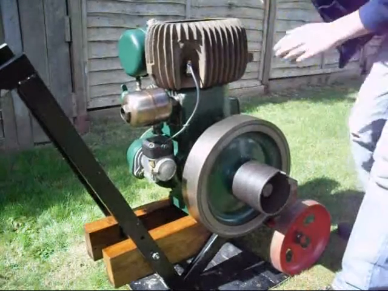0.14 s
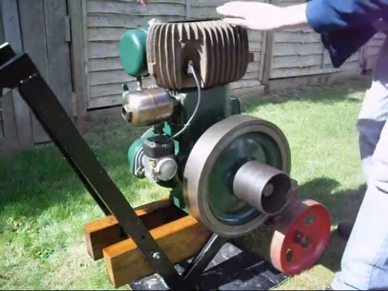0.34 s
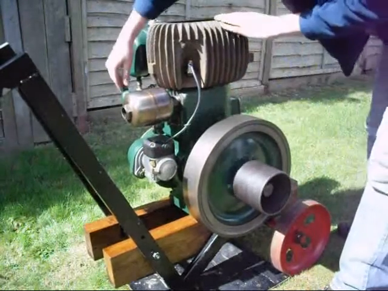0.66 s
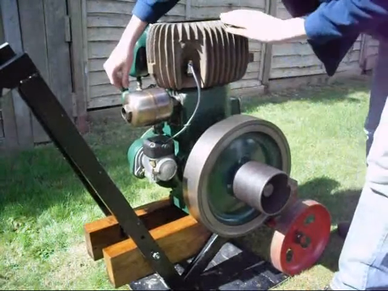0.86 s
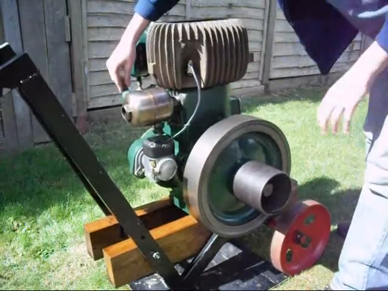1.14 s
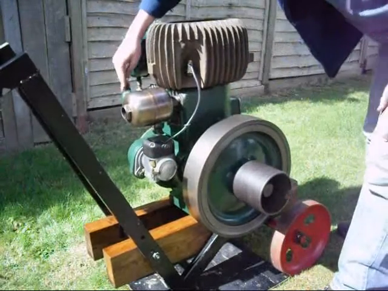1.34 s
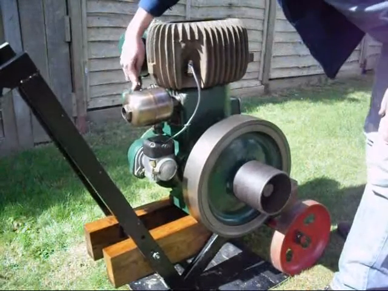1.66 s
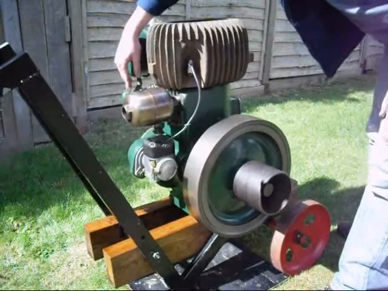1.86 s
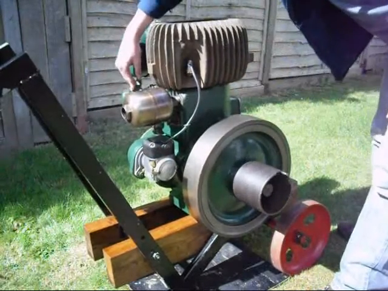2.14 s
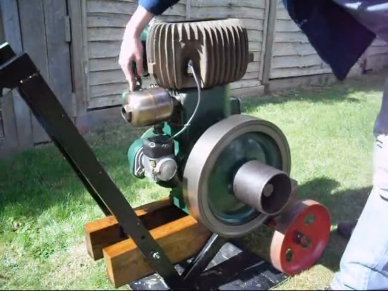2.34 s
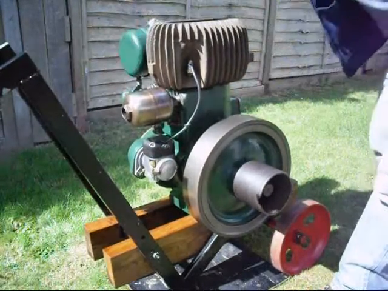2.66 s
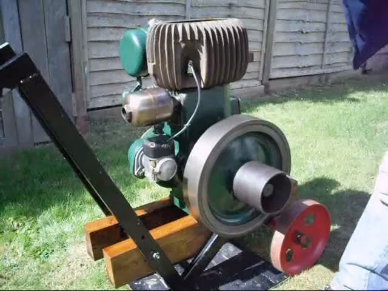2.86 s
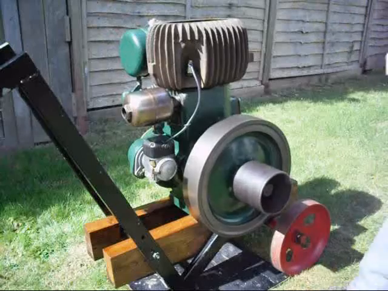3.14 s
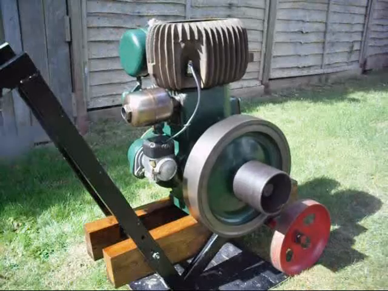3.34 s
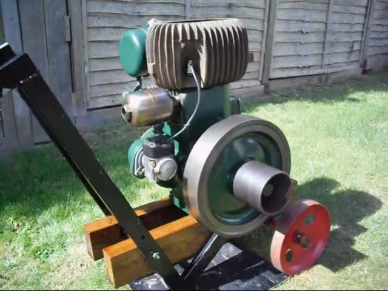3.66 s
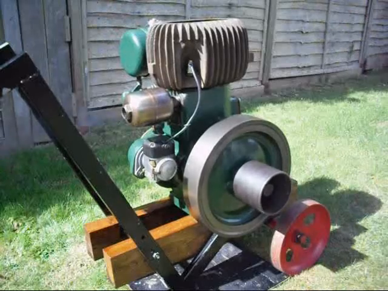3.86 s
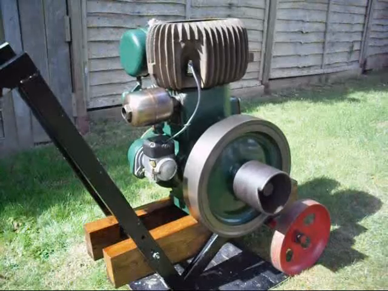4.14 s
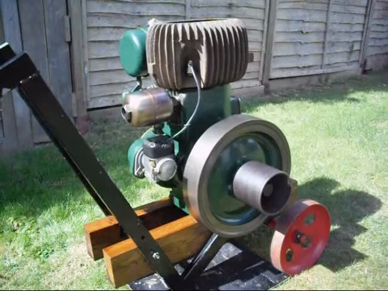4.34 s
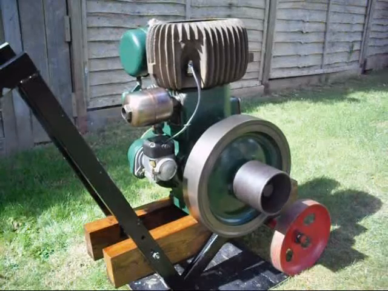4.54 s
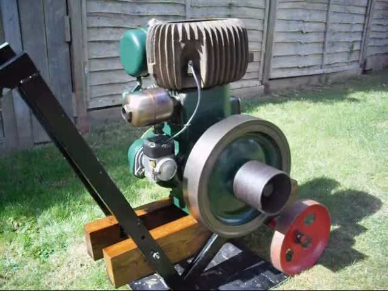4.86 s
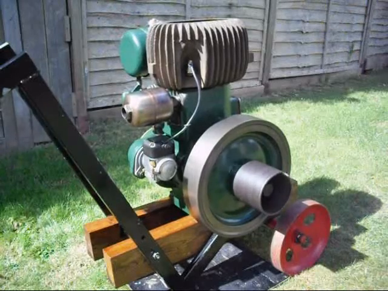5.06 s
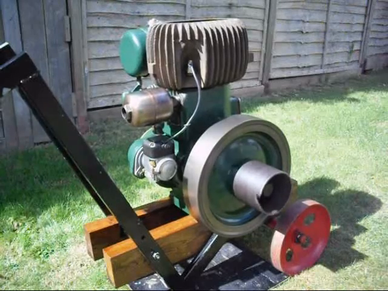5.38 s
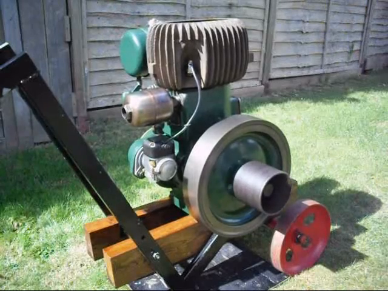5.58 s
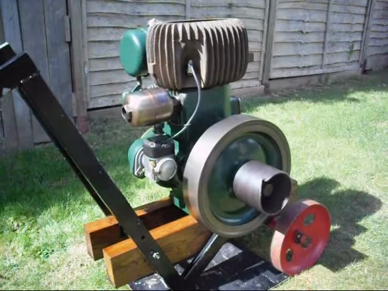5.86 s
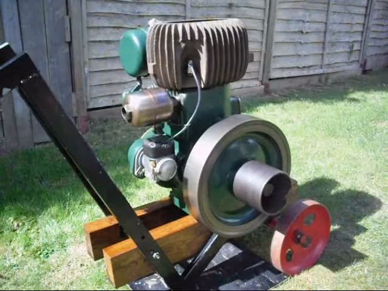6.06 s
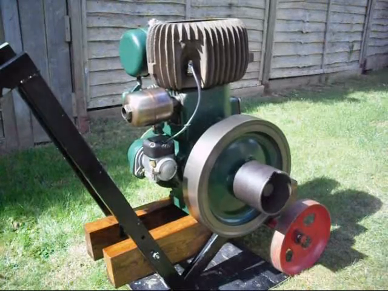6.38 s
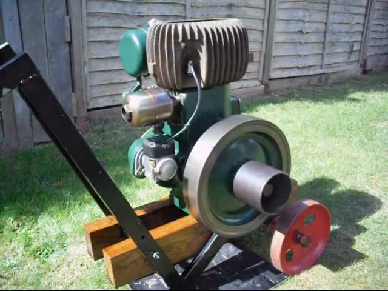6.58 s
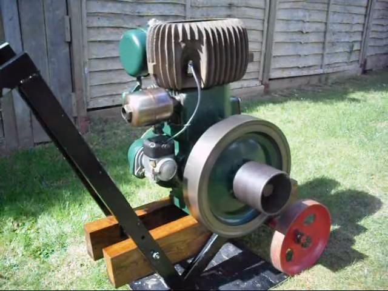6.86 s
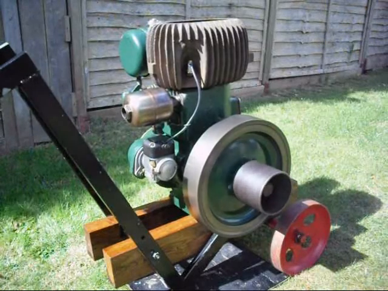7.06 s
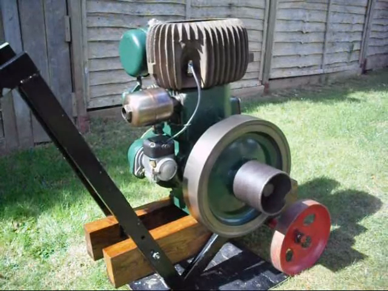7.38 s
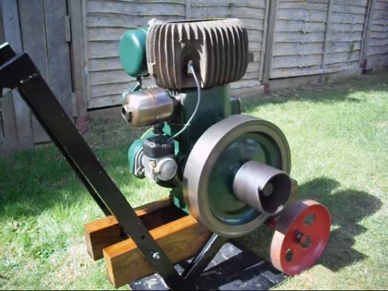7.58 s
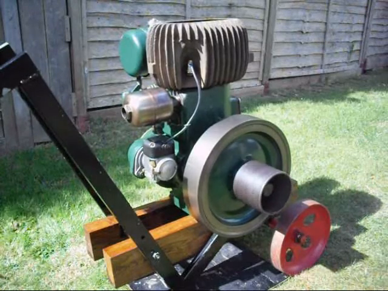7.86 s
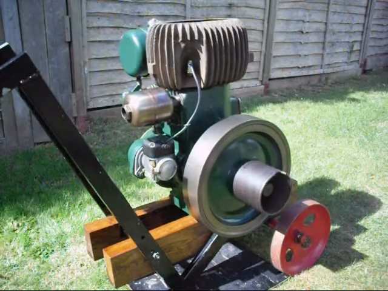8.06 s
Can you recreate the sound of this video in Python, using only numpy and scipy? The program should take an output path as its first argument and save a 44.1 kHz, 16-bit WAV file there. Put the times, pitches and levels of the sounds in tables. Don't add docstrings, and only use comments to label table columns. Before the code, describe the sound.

A single-cylinder petrol engine coughs up speed with separate sharp barks, stumbles on two misfires, then settles into a rapid even exhaust beat outdoors.

```python
import sys
import numpy as np
from scipy import signal
from scipy.fft import rfft, irfft, next_fast_len
from scipy.io import wavfile
from scipy.ndimage import uniform_filter1d

SR = 44100
rng = np.random.default_rng(int(sys.argv[2]) if len(sys.argv) > 2 else 0)


def makeup_ratio(level_db):
    decades = np.asarray(level_db, float) / 20
    return 10 ** decades


def transcribe(signal):
    frames = np.atleast_2d(signal).T
    limited = np.clip(frames, -1, 1)
    pcm = np.round(limited * 32767).astype(np.int16)
    wavfile.write(sys.argv[1], SR, pcm)


N = 362061


def evened(x):
    return x / np.sqrt(np.mean(x ** 2) + 1e-20)


def add(mix, s, sound):
    part = mix[round(s * SR):][:len(sound)]
    part += sound[:len(part)]


def coloured(x, points):
    f, db = np.transpose(points)
    size = next_fast_len(N)
    bins_hz = np.fft.rfftfreq(size, 1 / SR)
    gain = makeup_ratio(np.interp(np.log(bins_hz + 1), np.log(f + 1), db))
    return irfft(rfft(x, size) * evened(gain), size)[:N]


def modes(x, table):
    out = 0
    for hz, width, db in table:
        r = np.exp(-np.pi * width / SR)
        c = r * np.cos(2 * np.pi * hz / SR)
        ringing = signal.lfilter([1, -c], [1, -2 * c, r ** 2], x + 1e-18)
        out = out + makeup_ratio(db) * 2 * (1 - r) * ringing
    return out


def wander(length):
    once = uniform_filter1d(rng.standard_normal(N), int(length))
    return evened(uniform_filter1d(once, int(length)))


# (exhaust opens [s], blast peaks after [ms], blast [dB],
# silencer song [dB], its lead tone [Hz])
FIRINGS = [(0.314, 20.3, -12, -35, 4380), (0.6318, 17, -10, -32, 3950), (0.904, 16.6, -9, -28, 4180),
           (1.147, 16.7, -11.5, -28, 4030), (1.3747, 17.4, -10.5, -30.5, 3970),
           (1.5898, 13.3, -9, -28.5, 4470), (1.7891, 14.1, -7.5, -33.5, 4420),
           (1.9732, 11.3, -5.5, -35.5, 4320), (2.1453, 11, -5, -27.5, 4350),
           (2.3072, 12.3, -4.5, -30.5, 4460), (2.4627, 8, -32.7, -51, 2260),
           (2.6234, 16, -31.5, -46.5, 2520), (2.7848, 12.7, -16, -39, 2850), (2.954, 9.9, -19.5, -50, 2760),
           (3.1224, 10.9, -11, -25.5, 3980), (3.299, 15, -34, -46, 2700), (3.4758, 10.6, -10, -36, 4530),
           (3.6479, 11.5, -10, -32, 4050), (3.82, 11.8, -10.5, -31, 4280),
           (3.9914, 11.3, -13.5, -30.5, 4000), (4.161, 10.6, -12.5, -30, 4040),
           (4.329, 10, -12.5, -36, 4740), (4.4937, 11.7, -13.5, -33.9, 4250),
           (4.6607, 9.5, -11, -32.5, 4030)]
# (exhaust opens [s], firings counted [-])
GOVERNED = [(4.826, 0), (5.1554, 2), (5.9729, 7), (6.7882, 12), (7.4354, 16), (8.0776, 20)]
GOVERNED_DB = [-15.5, -16.5, -16, -14.5, -17, -21, -18.5, -16.5, -19.5, -17, -18, -17, -16.5, -18, -19,
               -18.5, -19.5, -19, -20, -17.5, -18]
GOVERNED_PEAK_MS = 9.4


def firings():
    blast_db = np.array(GOVERNED_DB)
    opened, counted = np.transpose(GOVERNED)
    opens = np.interp(np.arange(len(blast_db)), counted, opened)
    governed = np.c_[opens, GOVERNED_PEAK_MS + 0 * opens, blast_db]
    return np.r_[np.array(FIRINGS)[:, :3], governed]


FIRST_S, LAST_S = -0.083, 8.24


def openings():
    return np.r_[FIRST_S, firings()[:, 0], LAST_S]


# (share of the cycle [-], exhaust port [dB], carburettor [dB],
# gear load [dB])
FLOW = [(0, -25, -22, 5), (.04, 4, -34, 2.5), (.15, -1, 1, 7), (.26, 0.5, -16, 0.5), (.3, 2, -18, 3),
        (.34, -0.5, 1.5, 5), (.42, -27, 2, -2), (.5, -30, 1.5, -1.5), (.58, -7, -2, 0.5),
        (.63, -17, -12, -3), (.78, -20, -16, 0.5), (.9, -29, -26, -5), (1, -51, -9, -0.5)]


def by_angle(column):
    opens, table = openings(), np.transpose(FLOW)
    angle = np.interp(np.arange(N) / SR, opens, np.arange(len(opens))) % 1
    return np.interp(angle, table[0], table[column])


# (time [s], intake suction [dB], spent gas flow [dB])
THROTTLE = [(0, -43, -47), (.4, -40, -45.5), (1.43, -40, -41), (1.64, -35, -44), (2.35, -31.5, -51),
            (2.5, -50, -38.5), (2.67, -58, -39), (2.83, -45, -39), (3, -55, -44), (3.17, -47, -41),
            (3.35, -53, -44), (3.52, -46.5, -46), (4.2, -48.5, -43), (5, -50.5, -45), (6, -51, -51),
            (7, -50, -44.5), (8.2, -53, -43)]


def throttle(s, column):
    table = np.transpose(THROTTLE)
    return np.interp(s, table[0], table[column])


# (period [s], tick [dB])
TICK_DB = [(.23, -36), (.32, -38), (.4, -59)]
# (suction [dB], knock [dB])
KNOCK_DB = [(-47, -46), (-43, -30), (-39, -28)]
# (time [s], knock [dB])
HARD_KNOCKS = [(1.55, -23.5), (2.28, -25), (2.43, -33), (3.44, -32), (3.79, -34), (3.96, -31), (4.13, -29),
               (4.3, -29.5), (4.47, -35), (5.45, -39), (5.78, -38), (7.25, -37), (7.73, -33), (7.89, -35)]
INLET_SHUTS = .587


def cycles():
    opens = openings()
    start, period = opens[:-1], np.diff(opens)
    suction_db = throttle(start + .27 * period, column=1)
    knock_db = np.interp(suction_db, *np.transpose(KNOCK_DB))
    for s, db in HARD_KNOCKS:
        knock_db[np.searchsorted(opens, s) - 1] = db
    tick_db = np.interp(period, *np.transpose(TICK_DB))
    return np.c_[start + INLET_SHUTS * period, tick_db, suction_db, knock_db]


# (frequency [Hz], density [dB per Hz])
GULP = [(240, -61), (400, -48), (612, -26), (848, -9.5), (1070, -16), (1160, -12), (1580, -17.5),
        (2030, 1.5), (3100, -9.5), (3490, -3.5), (5400, 0.5), (7020, -41), (11900, -120)]
# (frequency [Hz], density [dB per Hz])
WHEEZE = [(300, -24), (900, -12), (1800, -4), (2700, 4), (3500, 5.5), (4400, -5.5), (5400, -11),
          (7000, -40)]
# (frequency [Hz], width [Hz], level [dB])
SHELL = [(1812, 173, -2), (2810, 20, -14), (2930, 17, -24), (3508, 150, -6.5), (3700, 180, -2),
         (3990, 28, 5.5), (4190, 96, 2.5), (4400, 79, -2.5), (4560, 16.7, -3.5), (4600, 44, -31)]
# (frequency [Hz], width [Hz], level [dB])
BLOCK = [(873, 23, -2.5), (1143, 36, 0.4), (1418, 36, 1), (2100, 95, -3), (2420, 120, -15)]


def strokes():
    t, opens = np.arange(N) / SR, openings()
    middles = opens[:-1] + 0.27 * np.diff(opens)
    suction_db = np.interp(t, middles, cycles()[:, 2])
    gulp_db = suction_db + by_angle(2) + 1.2 * wander(280)
    wheeze_db = throttle(t, column=2) + by_angle(1) + 1.0 * wander(90)
    noise = rng.standard_normal((2, N))
    wheeze = coloured(noise[1], WHEEZE) + makeup_ratio(-1) * modes(noise[1], SHELL)
    casting = modes(noise[0] * makeup_ratio(2.2 * wander(380)), BLOCK)
    gulp = coloured(noise[0], GULP) + makeup_ratio(7) * casting
    return makeup_ratio(gulp_db) * gulp + makeup_ratio(wheeze_db) * wheeze


# (frequency [Hz], density [dB per Hz])
GEARS = [(18, -37), (30, 1.5), (1180, -5), (1570, -8.5), (1710, -1), (1940, -5.5), (2170, -16.5),
         (2880, -5), (3140, -10), (3420, -8), (5400, -8), (7020, -51), (11900, -120)]
CLATTER_DB, CLATTER_DB_PER_DECADE, CLATTER_PER_SUCTION = -48.3, 22, .3


def clatter():
    t, opens = np.arange(N) / SR, openings()
    speed = np.interp(t, (opens[1:] + opens[:-1]) / 2, 1 / np.diff(opens)) / 6
    load_db = CLATTER_PER_SUCTION * np.maximum(throttle(t, column=1) + 42, 0)
    level = makeup_ratio(CLATTER_DB + CLATTER_DB_PER_DECADE * np.log10(speed) + load_db + by_angle(3))
    wash = coloured(rng.standard_normal(N), GEARS) * makeup_ratio(2.0 * wander(300))
    struck = rng.random(N) < 300 / SR
    force = makeup_ratio(2.1 * np.minimum(rng.exponential(1, N), 4))
    taps = struck * force * rng.choice([-1, 1], N)
    shake = modes(rng.standard_normal(N), [(46, 44, -2), (64, 22, 0.65), (96, 14, 1.3)])
    return level * (makeup_ratio(2.5) * wash + makeup_ratio(-1.5) * evened(modes(taps, BLOCK)) + makeup_ratio(-1) * evened(shake))


# (frequency [Hz], width [Hz], level [dB])
VALVE = [(3500, 600, -2), (4400, 500, 0), (1900, 500, -6)]
BOUNCE_S, BOUNCE = .005, .6


def valve_gear():
    ticks, clacks, knocks = np.zeros((3, N))
    opens, t = openings(), np.arange(1500) / SR
    second = BOUNCE * (t > BOUNCE_S) * np.exp(-abs(t - BOUNCE_S) / .005)
    landing = np.exp(-t / .0035) + second
    knock = np.minimum(t / 0.002, 1) * np.exp(-t / 0.011)
    spread = rng.standard_normal((len(opens) - 1, 4))
    for (s, tick_db, _, knock_db), start, period, z in zip(cycles(), opens, np.diff(opens), spread):
        add(ticks, s - .002, makeup_ratio(tick_db + 1.5 * z[0]) * landing)
        add(ticks, start + .3 * period, makeup_ratio(-40 + 2.5 * z[1]) * landing)
        add(clacks, start + .31 * period, makeup_ratio(-35.5 + 2.5 * z[2]) * np.exp(-t / .006))
        add(knocks, start + .818 * period, makeup_ratio(knock_db + 1.5 * z[3]) * knock)
    noise = rng.standard_normal((2, N))
    thud_band = signal.butter(2, [450, 2400], "band", fs=SR)
    thud = signal.lfilter(*thud_band, knocks * noise[1] + 1e-18 * noise[0])
    snap = signal.lfilter(*signal.butter(2, 2700, "high", fs=SR), (ticks + 1e-18) * noise[0])
    clack = makeup_ratio(14) * modes(clacks * noise[1], [(1770, 130, 0)])
    tick = makeup_ratio(13.5) * modes(ticks * noise[0], VALVE) + makeup_ratio(1.5) * snap
    return tick + clack + makeup_ratio(8.5) * modes(knocks * noise[1], BLOCK) + makeup_ratio(3) * thud


def snorts():
    level, leak = np.zeros((2, N))
    opens, t = openings(), np.arange(3000) / SR
    snort = np.minimum(t / .003, 1) * np.exp(-t / 0.02)
    for (_, _, suction_db, knock_db), start, period in zip(cycles(), opens, np.diff(opens)):
        add(level, start + 0.333 * period, makeup_ratio(2.05 * suction_db + 40) * snort)
        squeeze = np.hanning(int(.17 * period * SR))
        add(leak, start + 0.703 * period, makeup_ratio(knock_db - 7.5) * squeeze)
    blowby = modes(leak * rng.standard_normal(N), [(2210, 470, 7.2)])
    air = level * makeup_ratio(5.4 * wander(80)) * rng.standard_normal(N)
    throat = modes(air, [(960, 220, -1.8), (1500, 360, -2.4), (2320, 270, -0.19)])
    return blowby + makeup_ratio(-6) * coloured(air, GULP) + makeup_ratio(9.5) * throat


MISFIRES = (2.64, 3.315)


def misfired(s):
    return min(abs(s - m) for m in MISFIRES) < .025


# (time [s], level [dB])
PIPE_DB = [(.3, -23.5), (.9, -20.5), (1.38, -20.8), (1.59, -17.5), (2.31, -19.5), (2.46, -33),
           (2.78, -27.5), (2.96, -28.5), (3.12, -19.5), (5, -19), (5.5, -20.3), (8.2, -19.7)]
SUCK_BACK_DB = -22.5
THUMP_LAG_S, LAG_PER_PERIOD, LAG_S_PER_DB = .0121, .065, .00035


def collapses():
    opens, _, blast_db = firings().T
    strength_lag = LAG_S_PER_DB * np.maximum(blast_db, -19.5)
    lowest = opens + THUMP_LAG_S + LAG_PER_PERIOD * np.diff(openings())[1:] + strength_lag
    pipe_db = np.interp(opens, *np.transpose(PIPE_DB))
    return [(s, SUCK_BACK_DB if misfired(s) else db) for s, db in zip(lowest, pipe_db)]


def thumps():
    out, t = np.zeros(N), np.arange(-1100, 4400) / SR
    for (s, db), (opens, _, blast_db) in zip(collapses(), firings()):
        u = t / (1 + 22 * (s - opens - .016) + .075 * max(blast_db + 10, 0))
        swing = np.where(u < 0, np.exp(u / .022 - (u / .0076) ** 2), np.exp(-u / .0066))
        turns = np.where(u < 0, np.maximum(150 * u, -.5), 117 * u)
        body_hz = rng.uniform(325, 415)
        body = .27 * np.exp(-(t / .0052) ** 2) * np.cos(2 * np.pi * body_hz * t)
        pulse = swing * np.cos(2 * np.pi * turns) - body
        pulse = pulse - makeup_ratio(-23.5) * np.roll(pulse, 1550) + makeup_ratio(-21) * np.roll(pulse, 1950)
        add(out, s + t[0], makeup_ratio(db + 0.6) * pulse * (1 if misfired(s) else -1))
        crack = np.exp(-((t - t[0] - .01) / .0011) ** 2) * (not misfired(s))
        add(out, opens - .01, -makeup_ratio(-21.5 + .4 * blast_db) * crack)
    return out


LOW_JET_HZ = [2200, 2620, 3050, 3080, 3450]
SOFT_JET_HZ = [2770, 3600, 4370]
JET_UNDER_SONG = .97


def jet_tones(k, pick):
    if k < len(FIRINGS):
        return JET_UNDER_SONG * FIRINGS[k][4], LOW_JET_HZ[np.argmin(pick)]
    return np.array(SOFT_JET_HZ)[np.argsort(pick[:3])]


# (frequency [Hz], density [dB per Hz])
BLAST = [(290, -4), (500, -10), (667, -20.5), (1200, -11.5), (1510, -12), (2880, 2), (3660, -3), (4010, -9),
         (5400, 2), (7020, -33), (11900, -120)]
# (frequency [Hz], width [Hz], level [dB])
OUTLET = [(1370, 67, -9), (2010, 185, -4), (2850, 470, -3.5), (3600, 260, -5.5), (4380, 740, -1.5)]


def blasts():
    level, roar, tones = np.zeros((3, N))
    t = np.arange(5000) / SR
    jet = makeup_ratio(2.0 * wander(26)) * rng.standard_normal(N)
    picks = rng.random((len(firings()), len(LOW_JET_HZ)))
    for row, (s, peak_ms, blast_db) in enumerate(firings()):
        peak = peak_ms / 1000
        rise = makeup_ratio(-(8.5 + 0.66 * peak_ms) * (1 - t / peak)) * np.minimum(t / 0.0048, 1)
        fall = 0.97 * np.exp(-(t - peak) / 0.0051) + 0.15 * np.exp(-(t - peak) / .014)
        shape = np.where(t < peak, rise, fall)
        add(level, s, makeup_ratio(blast_db) * shape)
        add(roar, s, makeup_ratio(1.5 * blast_db) * shape)
        puff = makeup_ratio(blast_db) * shape * np.resize(jet[round(s * SR):][:len(t)], len(t))
        favoured = [(hz, 150, -2.0 * k) for k, hz in enumerate(jet_tones(row, picks[row]))]
        add(tones, s, modes(puff, favoured))
    outlet, shell = 0, 0
    for mode in OUTLET:
        outlet = outlet + modes(modes(level * jet * makeup_ratio(3.0 * wander(1500)), [mode]), [mode])
    for mode in SHELL:
        shell = shell + modes(roar * jet * makeup_ratio(3.5 * wander(1500)), [mode])
    growl = modes(roar * jet, [(1290, 520, -3.5)])
    bang = makeup_ratio(1) * coloured(roar * jet, BLAST) + makeup_ratio(4) * growl + makeup_ratio(4) * outlet
    bang = bang + makeup_ratio(8.5) * shell + makeup_ratio(9) * tones
    above_bass = signal.butter(3, 340, "high", fs=SR, output="sos")
    return signal.sosfilt(above_bass, bang)


SONG_HZ = [2900, 3800, 3990, 4200, 4450, 4680]
GOVERNED_SONG_DB, SONG_PER_BLAST_DB = -46.5, 1.5
SONG_LAG_S = .0105


def songs():
    rows, picks = [], rng.random((len(firings()), len(SONG_HZ)))
    for k, (opens, peak_ms, blast_db) in enumerate(firings()):
        heat = 1 + .025 * (picks[k] - .5)
        tones_hz = np.array(SONG_HZ)[np.argsort(picks[k])] * heat
        steady = GOVERNED_SONG_DB + SONG_PER_BLAST_DB * (blast_db + 18), tones_hz[-1]
        db, lead_hz = FIRINGS[k][3:] if k < len(FIRINGS) else steady
        others_hz = tones_hz[abs(tones_hz - lead_hz) > 170][:3]
        rows.append((opens + peak_ms / 1000 + SONG_LAG_S, db, lead_hz, *others_hz))
    return rows


SONG_OTHERS_DB = -6.5


def rings():
    out, t = np.zeros(N), np.arange(5000) / SR
    chance = rng.random((len(firings()), 4))
    decay = makeup_ratio(-520 * (t - 0.026)) * makeup_ratio(-1500 * np.maximum(t - .055, 0))
    shape = np.minimum(t / 0.0035, 1) * decay
    heights = makeup_ratio(SONG_OTHERS_DB * np.array([0, 1, 1, 1.6]))
    for (s, db, *tones_hz), starts in zip(songs(), chance):
        chord = sum(h * np.sin(2 * np.pi * (hz * t + p)) for h, hz, p in zip(heights, tones_hz, starts))
        add(out, s - .006, makeup_ratio(db + 0.5) * shape * chord)
    return out * makeup_ratio(2.1 * wander(110))


# (delay [ms], level [dB])
ECHOES = [
    (3.1, -44.5),
    (7.4, -28),
    (35, -29),
    (58, -48),
]


def garden(x):
    taps = np.zeros(4000)
    taps[0] = 1
    for k, (ms, db) in enumerate(ECHOES):
        taps[int(ms * SR / 1000)] += (-1) ** k * makeup_ratio(db)
    return signal.oaconvolve(x, taps)[:N]


def scene():
    engine = strokes() + clatter() + valve_gear() + snorts()
    exhaust = thumps() + garden(blasts() + rings())
    return (engine + exhaust)[None]


def roll_off(x):
    return signal.sosfilt(signal.butter(12, 15940, fs=SR, output="sos"), x)


HOLD = 4


def record(dry):
    heard = signal.lfilter(*signal.butter(1, 18, "high", fs=SR), dry)
    band = signal.oaconvolve(heard, signal.firwin(161, 5420, fs=SR)[None], "same")
    slow = np.clip(band, -.95, .95)[:, ::HOLD]
    held = np.repeat(slow, HOLD, axis=1)[:, :N]
    smoothing = signal.firwin(301, 15650, window=("kaiser", 8), fs=SR)
    cut = signal.oaconvolve(held, smoothing[None], "same")
    return roll_off(np.clip(cut, -1, 1))


dry = scene()
out = record(dry)
transcribe(out)
```